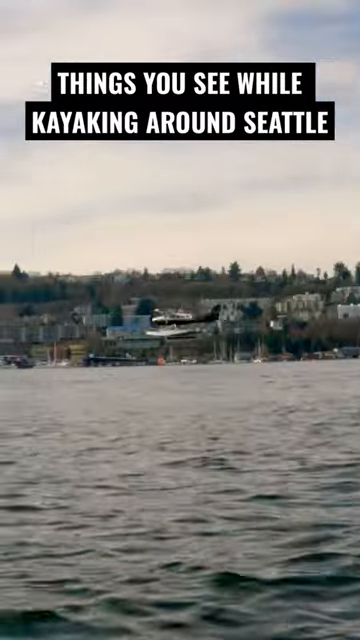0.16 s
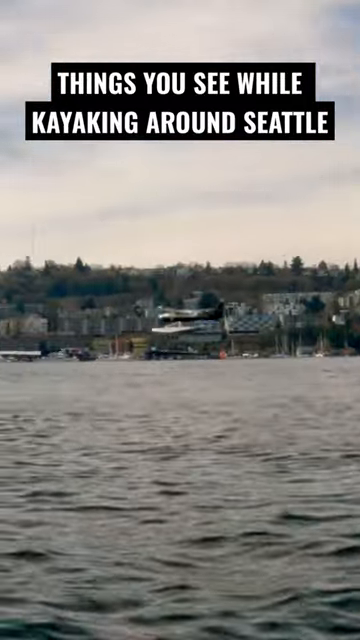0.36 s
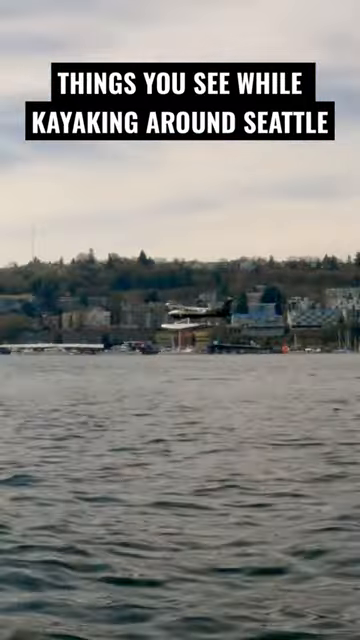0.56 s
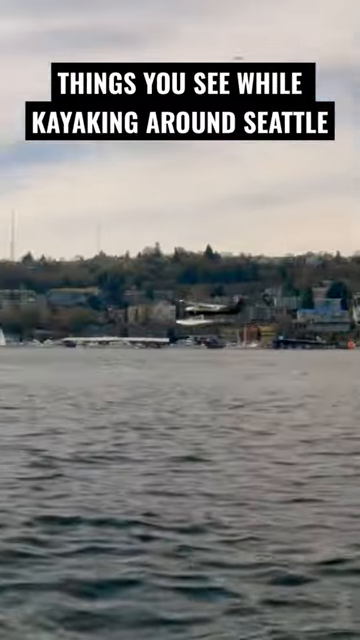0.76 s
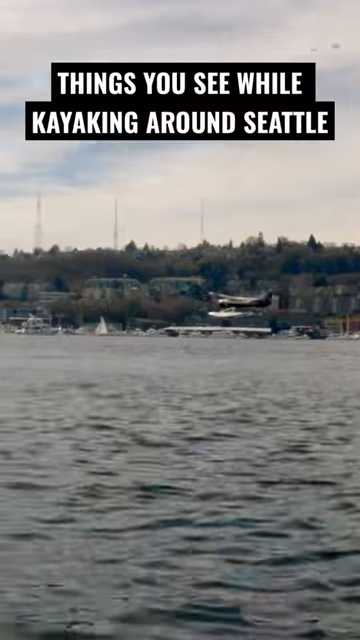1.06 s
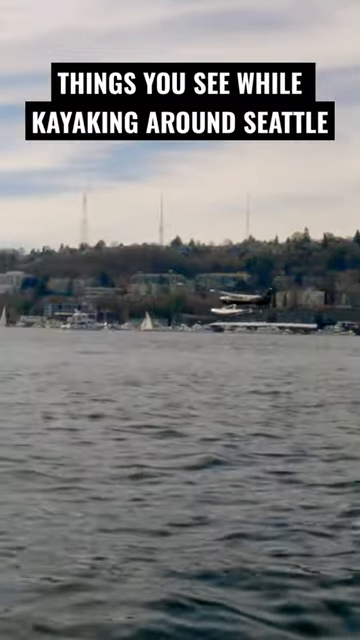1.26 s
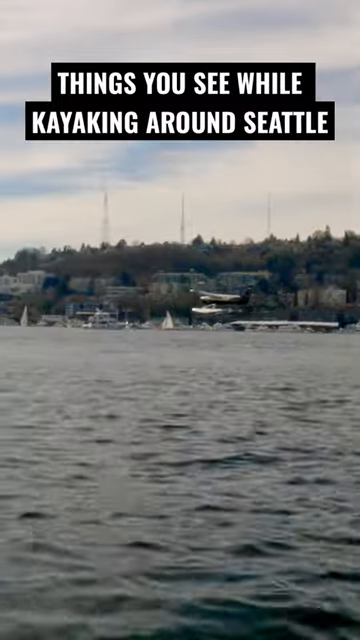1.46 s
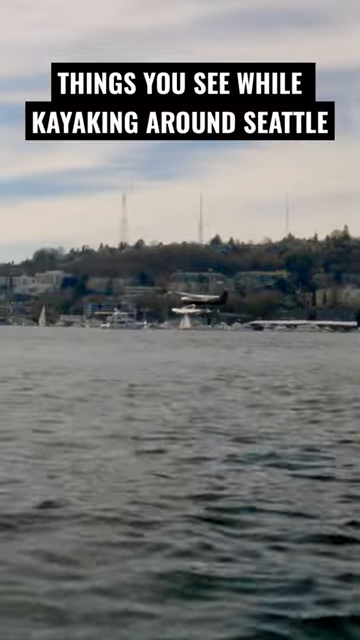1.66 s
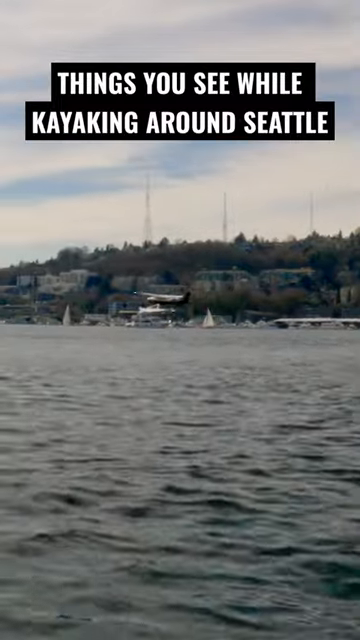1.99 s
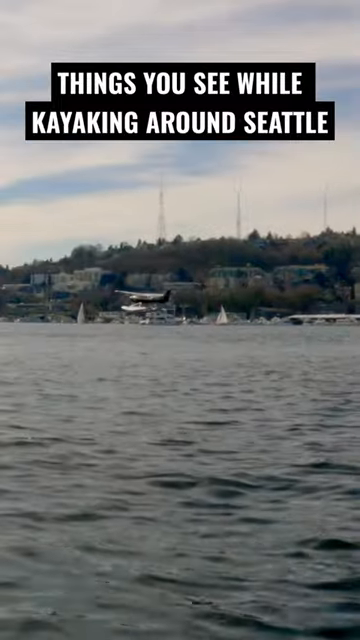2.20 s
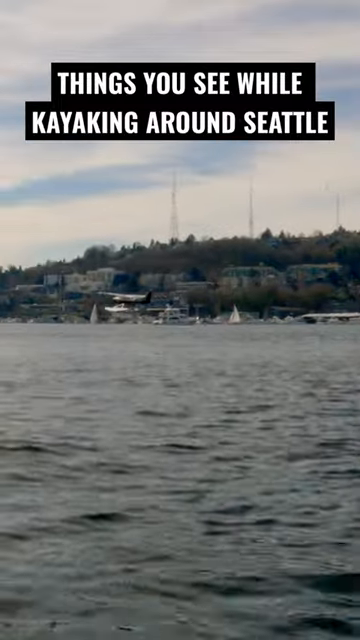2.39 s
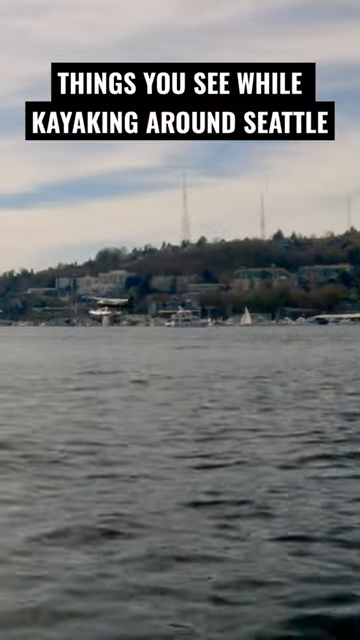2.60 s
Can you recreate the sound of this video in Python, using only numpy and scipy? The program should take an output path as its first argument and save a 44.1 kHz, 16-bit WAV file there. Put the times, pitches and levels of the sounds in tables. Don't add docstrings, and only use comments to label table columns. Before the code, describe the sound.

Low, wavering propeller plane drone sinks slightly in pitch as wavelets smack and trickle close by

```python
import sys
import numpy as np
from scipy import signal
from scipy.fft import rfft, irfft, next_fast_len
from scipy.io import wavfile
from scipy.ndimage import uniform_filter1d, map_coordinates

SR = 44100
rng = np.random.default_rng(int(sys.argv[2]) if len(sys.argv) > 2 else 0)


def ratio(d):
    e = np.asarray(d, float) / 20
    return 10 ** e


def master_out(mix):
    frames = np.transpose(np.atleast_2d(mix))
    ceiling = np.clip(frames, -1, 1)
    pcm = np.round(ceiling * 32767).astype(np.int16)
    wavfile.write(sys.argv[1], SR, pcm)


N = 120834
T = np.arange(N) / SR

# time_s, level_db
BLADE_PATH = [(0, -16), (.1, -19), (.22, -19), (.35, -16), (.5, -15), (.68, -16.5), (.8, -18),
              (1.06, -18.5), (1.32, -15.5), (1.55, -16), (1.7, -26), (1.85, -21), (1.98, -18),
              (2.22, -17.5), (2.36, -19.5), (2.49, -31.5), (2.6, -23.5), (2.74, -18.5)]
# multiple_of_engine_cycle, start_db, end_db, share_of_path_swing, phase_rad
ENGINE_ORDERS = [(3, -50, -47, .3, .7), (6, -19.6, -19.6, 1, 0), (9, -30.5, -33, .15, 1.3),
                 (12, -42, -37, -.4, -1.2), (15, -38.5, -50, .1, 2.6), (20, -54, -47, 0, 2.5),
                 (21, -54, -37.5, 0, -.2), (22, -55, -48, 0, 3), (24, -44, -62, 0, -2.6),
                 (27, -49, -62, 0, 0), (33, -50, -58, 0, 0), (35, -57, -53, 0, 1), (36, -58, -46, 0, 1)]
# time_s, level_db
ROAR_LEVEL = [(0.0, -37.5), (0.34, -37), (0.74, -40), (0.9, -40.5), (1.23, -40.5), (1.54, -42.5),
              (2.04, -42), (2.38, -42.5), (2.74, -41)]
# pitch_hz, level_db
ROAR_COLOUR = [(200, -9), (400, -5), (850, -12.5), (1100, -17), (1700, -20), (2500, -17.5), (3600, -26.5),
               (5500, -67)]
# pitch_hz, level_db
RUMBLE_COLOUR = [(20, -31), (35, -16), (70, 4), (115, -5), (200, -7), (350, -20.5), (600, -26),
                 (1200, -100)]
# start_s, smack_db, boom_db, length_ms
SLAPS = [(.066, -27, -30, 7), (.110, -25, -24, 3), (.158, -29, -28, 6), (.182, -31, -23, 3),
         (.253, -29, -30, 6), (.295, -27, -30, 2), (.340, -29, -34, 5), (.809, -28, -18.5, 12),
         (1.015, -36, -26, 6), (1.380, -30, -36, 8), (2.0708, -22, -14, 9), (2.573, -27, -25, 5),
         (2.6075, -29, -30, 3), (2.652, -33, -33, 4), (2.716, -40, -23, 4)]
# pitch_hz, level_db
SMACK_COLOUR = [(150, -24), (350, -6), (700, -3), (1100, 0), (1500, -6), (2200, -30)]
# pitch_hz, level_db
SNAP_COLOUR = [(1200, -25), (1800, -4), (2600, 0), (3400, -8), (4500, -18), (6000, -30), (8000, -50)]
# start_s, level_db
CRACKLES = [(.021, -37), (.125, -34), (.2109, -35), (.231, -36), (.312, -35), (.378, -33), (.4075, -32),
            (.4469, -33), (.4728, -34), (.7921, -35), (1.0595, -38), (1.2625, -37), (1.5075, -39),
            (1.7559, -39), (1.7853, -36), (1.917, -39), (2.0775, -36), (2.145, -39), (2.2378, -38),
            (2.3136, -38), (2.376, -40), (2.4289, -40)]
# start_s, level_db
TICKS = [
    (.066, -50),
    (.1094, -46),
    (.4095, -52),
    (.4442, -53),
    (1.0423, -53),
    (1.785, -53),
    (1.9992, -44),
    (2.0715, -54),
    (2.573, -58),
    (2.6073, -57),
]
# pitch_hz, level_db
TICK_COLOUR = [(2500, -30), (4500, -1), (5200, 0), (6200, -9), (7500, -12), (9000, -19), (12000, -34)]
# time_s, level_db
WASH_LEVEL = [(0, -50), (.4, -47.5), (.65, -55), (.95, -48), (1.27, -42.5), (1.55, -46.5), (1.8, -43),
              (2.1, -43), (2.3, -49), (2.74, -60)]
# pitch_hz, level_db
WASH_COLOUR = [(500, -51), (850, -12), (1000, 2), (1350, -8.5), (1700, -16), (2600, -58.5)]
# time_s, level_db
FIZZ_LEVEL = [(0, -55), (.4, -50), (.63, -58.5), (.94, -52), (1.27, -52), (1.5, -54), (1.75, -53),
              (2.11, -51), (2.23, -61.5), (2.74, -58.5)]
# pitch_hz, level_db
FIZZ_COLOUR = [(2000, -42.5), (2800, -18), (3700, 4.5), (4400, -3), (5200, -3.5), (5700, -14), (6200, -47),
               (8000, -58)]
# pitch_hz, level_db
SPRAY_COLOUR = [(3000, -50), (4500, -13.5), (6000, 1.5), (7600, -2.5), (8400, -9), (10000, -21),
                (12500, -39)]
# pitch_hz, likeness_0_to_1
PORT_LIKENESS = [(30, .995), (250, .99), (500, .94), (800, .93), (1500, .88), (3000, .92), (5000, .8),
                 (8000, .8)]
# pitch_hz, lead_rad
PORT_LEAD = [(330, 0), (1030, -.1), (3190, -1.9), (3790, -2.7), (4310, -5.7), (5430, -6.2), (7000, -6.28)]
# pitch_hz, level_db
PORT_TILT = [(330, 0), (700, 1.2), (1200, 3), (2000, 4.5), (3200, 0), (5000, -6), (8000, -1)]

TOP_HZ = 6500


def unit(x):
    return x / np.sqrt(np.mean(x ** 2) + 1e-20)


def along(points, hz):
    f, v = np.transpose(points)
    return np.interp(np.log(hz + 1), np.log(f + 1), v)


def curve(rows):
    return np.interp(T, *np.transpose(rows))


def wobble(rate):
    knots = rng.standard_normal(int(N * rate / SR) + 4)
    return map_coordinates(knots, [T * rate])


def filtered(x, response):
    edge = 4096
    m = next_fast_len(N + 2 * edge)
    wide = np.pad(x, [(0, 0), (edge, m - N - edge)], "reflect")
    spectrum = rfft(wide) * response(np.fft.rfftfreq(m, 1 / SR))
    return irfft(spectrum, m)[..., edge:edge + N]


def rush(colour, patchy_db, gate=1):
    z = signal.stft(rng.standard_normal((2, N)), nperseg=512)[2]
    field = uniform_filter1d(rng.standard_normal(z.shape[1:]), size=6, axis=0)
    patches = unit(uniform_filter1d(field, size=12, axis=1))
    pair = signal.istft(z * ratio(patchy_db * patches), nperseg=512)[1][:, :N]
    return unit(filtered(pair * gate, lambda hz: ratio(along(colour, hz))))


def spread(pair):
    def mid_side(hz):
        turn = np.arccos(np.clip(along(PORT_LIKENESS, hz), -1, 1)) / 2
        return np.array([np.cos(turn), np.sin(turn)])
    mid, side = filtered(pair, mid_side)
    return np.array([mid + side, mid - side])


def cycle():
    blade_hz = 93.342 - 3.6964 * T + .35133 * T * T
    return (2.233 + 2 * np.pi * np.cumsum(blade_hz) / SR) / 6


def drone():
    swing = uniform_filter1d(curve(BLADE_PATH), size=2000)
    swing = swing - swing.mean()
    db_per_s = uniform_filter1d(np.gradient(swing) * SR, size=5000)
    beat_rad = -.45 * np.tanh(db_per_s / 15)
    turned = .5 + .5 * np.tanh((T - 1.5) / .55)
    firing_echo = 1 - .55 * np.exp(2j * np.pi * (T - .6) / .53)
    phase = cycle()
    total = 0
    for order, start_db, end_db, share, rad in ENGINE_ORDERS:
        flutter_db = .6 * (2 - 1.1 * share) * (wobble(4.1) + wobble(13))
        level_db = start_db + (end_db - start_db) * turned + share * swing + flutter_db
        wander_rad = .07 * (order / 6 - .5) * wobble(9)
        path = firing_echo if order == 9 else np.exp(1j * share * beat_rad)
        tone = np.real(path * np.exp(1j * (order * phase + rad + wander_rad)))
        total = total + np.sqrt(2) * ratio(level_db) * tone
    return total


def roar():
    phase = cycle()
    puff = ratio(np.cos(6 * phase) + np.cos(3 * phase) + .34 * wobble(10.03))
    rumble = ratio(-34 + 1.4 * wobble(4.4)) * rush(RUMBLE_COLOUR, 1.2)
    exhaust = ratio(curve(ROAR_LEVEL) + 4) * rush(ROAR_COLOUR, 1.8, puff)
    return filtered(exhaust + rumble, lambda hz: 1 / (1 + (hz / TOP_HZ) ** 8))


def burst(start_s, length_s):
    u = np.maximum(T - start_s, 0) / length_s
    return (1 - np.exp(-8 * u)) * np.exp(-u)


def bursts(rows, colour):
    noise = rush(colour, .1)
    total = 0
    for start_s, level_db, length_s in rows:
        shape = burst(start_s, length_s)
        evened = np.linalg.norm(shape) / np.linalg.norm(shape * noise[0])
        total = total + ratio(level_db) * shape * noise * evened
    return total


def boom(start_s, level_db):
    hull_hz, rise_s, hold_s, crest_s = 110, .01, .048, .014
    u = np.maximum(T - start_s, 0)
    envelope = (1 - np.exp(-u / rise_s)) * np.exp(-(u / hold_s) ** 6)
    return ratio(level_db) * envelope * np.cos(2 * np.pi * hull_hz * (u - crest_s))


def slaps():
    smack = bursts([(s, db, ms / 1300) for s, db, _, ms in SLAPS], SMACK_COLOUR)
    snaps = [(s, db - 8, ms / 1800) for s, db, _, ms in SLAPS]
    crackles = [(s, db, .003) for s, db in CRACKLES]
    water = smack + bursts(snaps + crackles, SNAP_COLOUR)
    ticks = bursts([(s, db, .0035) for s, db in TICKS], TICK_COLOUR)
    right = ratio(-5) * (water[0] + 1.2 * water[1])
    near = np.array([water[0], right]) + sum(boom(s, db) for s, _, db, _ in SLAPS)
    return filtered(near, lambda hz: 1 / (1 + (hz / TOP_HZ) ** 6)) + spread(ticks)


def wash():
    return ratio(curve(WASH_LEVEL) + .44 * wobble(12)) * rush(WASH_COLOUR, 1.0)


def fizz():
    grains = ratio(2.2 * wobble(300) + 1.3 * wobble(18))
    level_db = curve(FIZZ_LEVEL)
    spray_db = -67 - 10 * T / T[-1] + .6 * (level_db - level_db.mean())
    ripples = ratio(level_db) * rush(FIZZ_COLOUR, .73, grains)
    return ripples + ratio(spray_db) * rush(SPRAY_COLOUR, .47, grains)


def scene():
    return drone() + spread(roar() + wash() + fizz()) + slaps()


def roll_off(x):
    return signal.sosfilt(signal.butter(12, 12360, fs=SR, output="sos"), x)


def record(dry):
    half = np.array([[.5], [-.5]])

    def port(hz):
        return ratio(half * along(PORT_TILT, hz)) * np.exp(1j * half * along(PORT_LEAD, hz))
    return roll_off(filtered(dry, port))


dry = scene()
out = record(dry)
master_out(out)
```